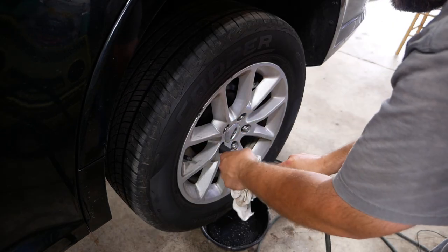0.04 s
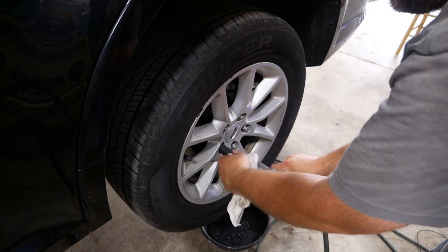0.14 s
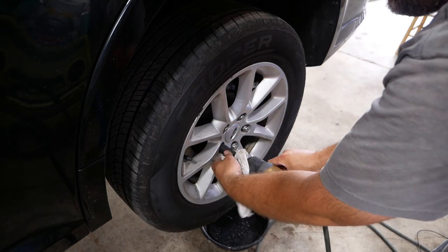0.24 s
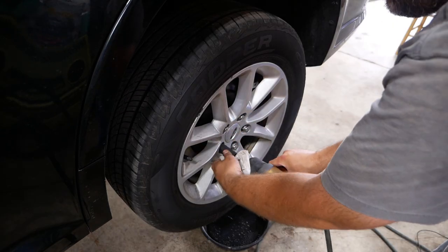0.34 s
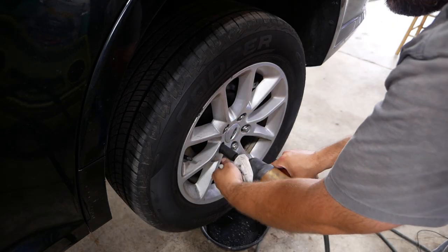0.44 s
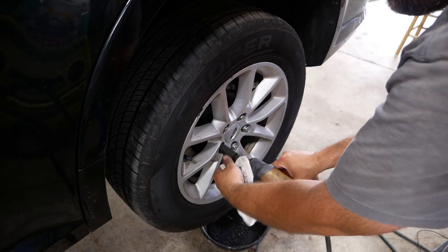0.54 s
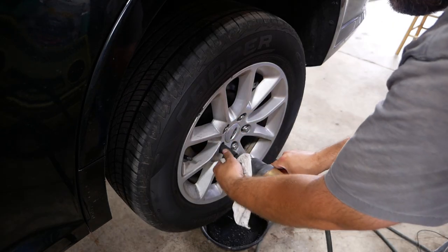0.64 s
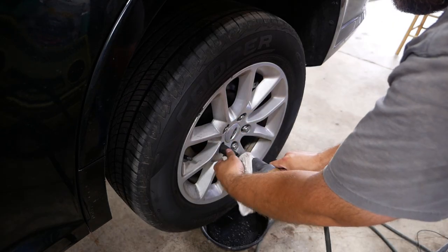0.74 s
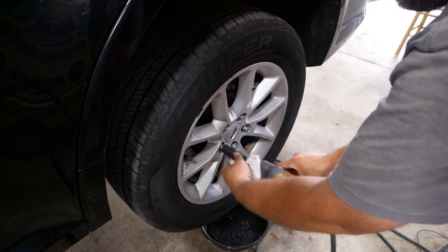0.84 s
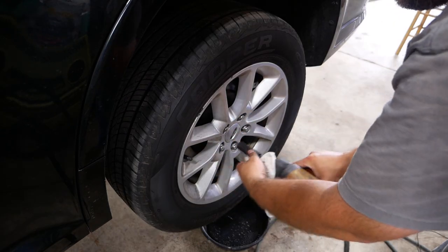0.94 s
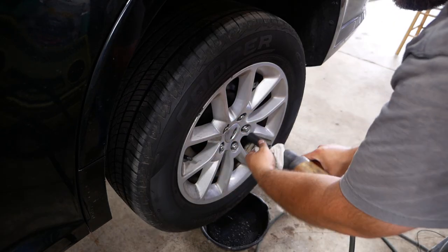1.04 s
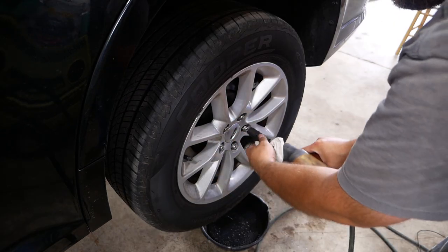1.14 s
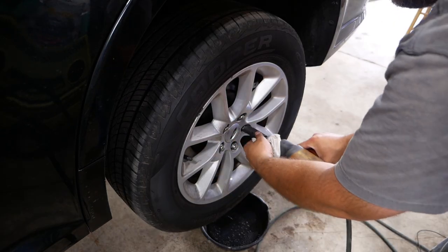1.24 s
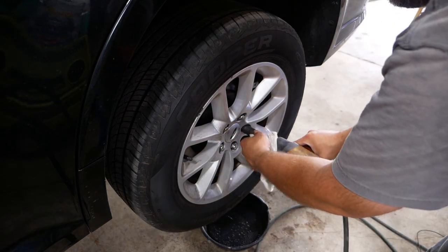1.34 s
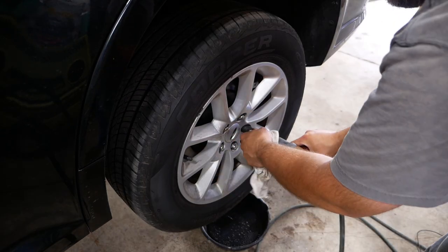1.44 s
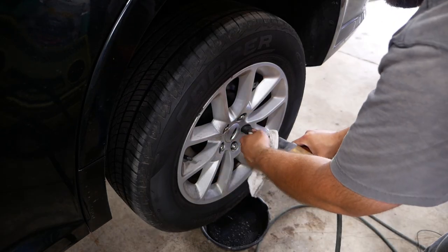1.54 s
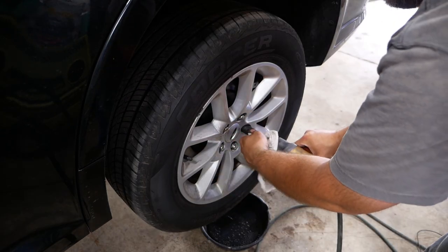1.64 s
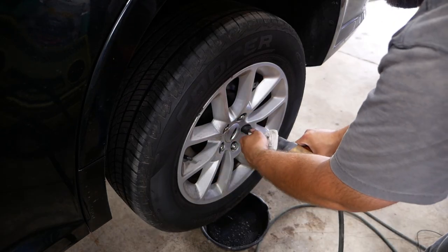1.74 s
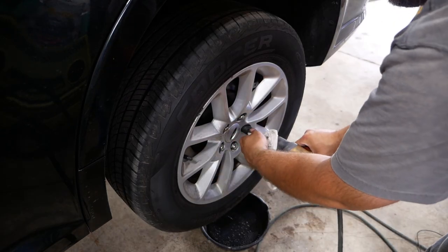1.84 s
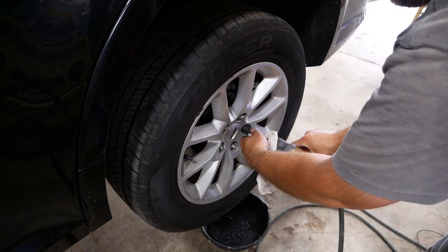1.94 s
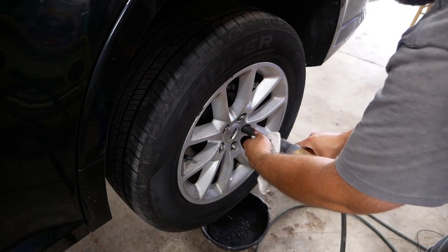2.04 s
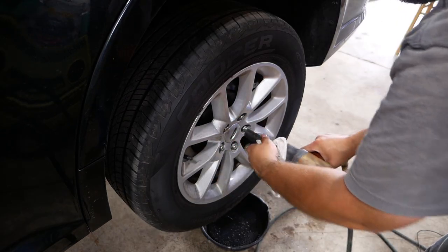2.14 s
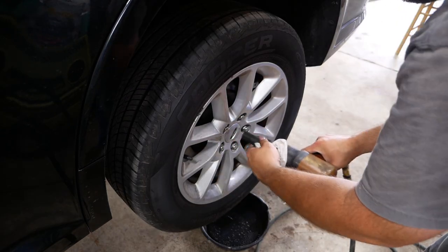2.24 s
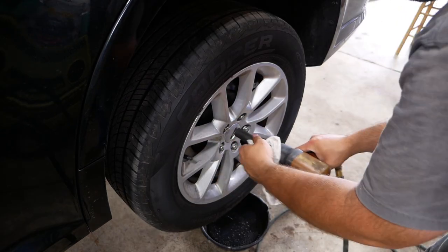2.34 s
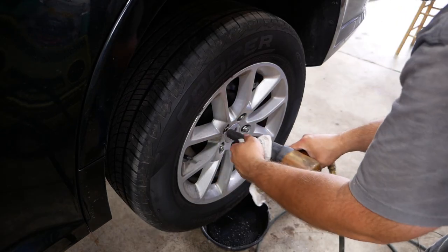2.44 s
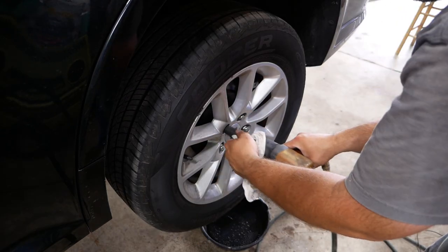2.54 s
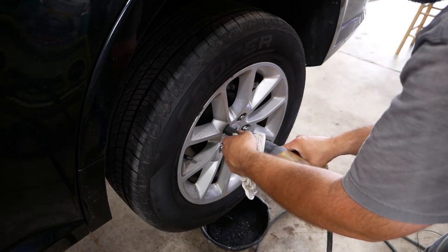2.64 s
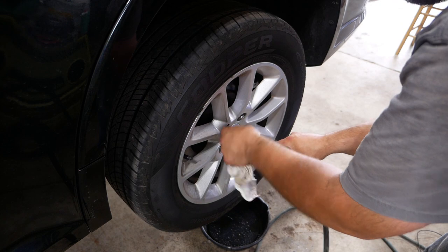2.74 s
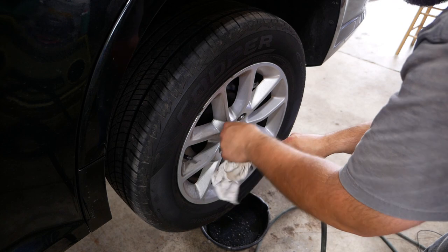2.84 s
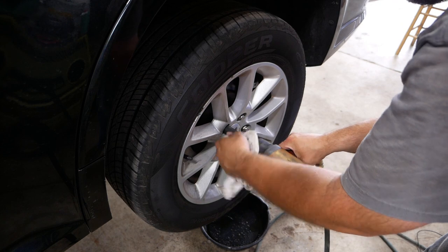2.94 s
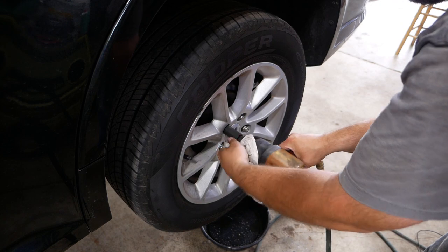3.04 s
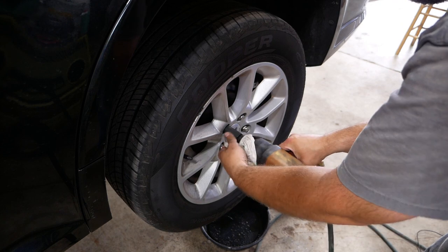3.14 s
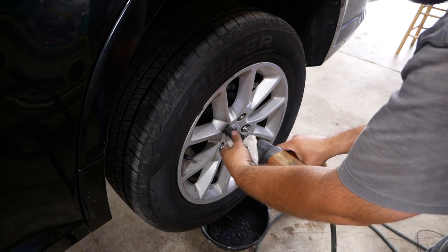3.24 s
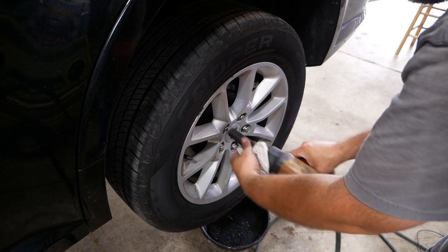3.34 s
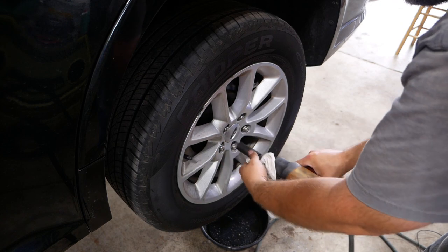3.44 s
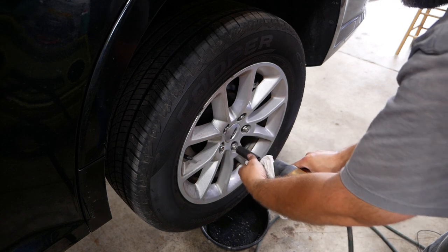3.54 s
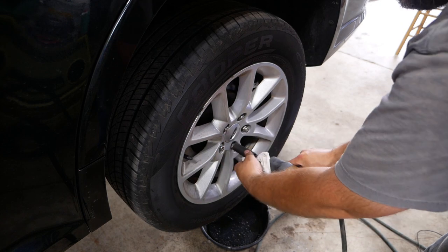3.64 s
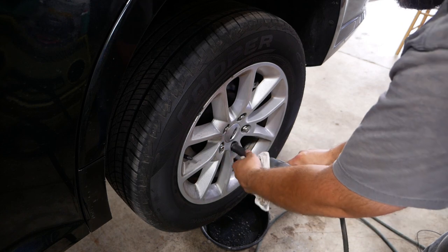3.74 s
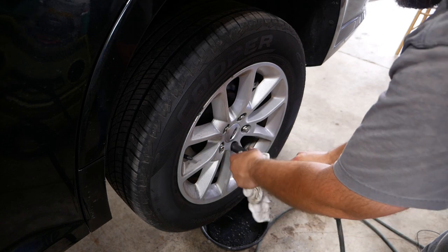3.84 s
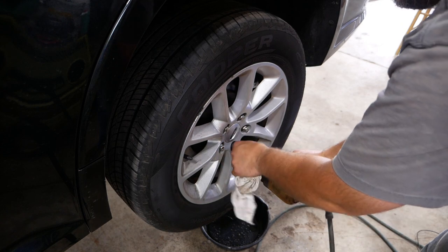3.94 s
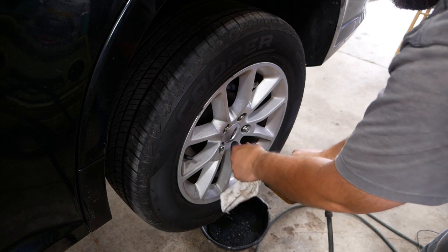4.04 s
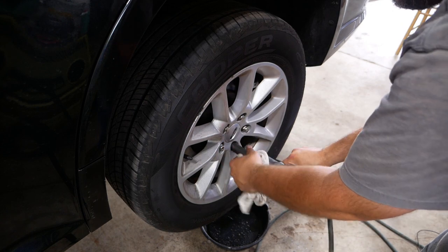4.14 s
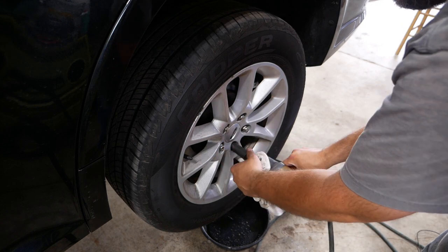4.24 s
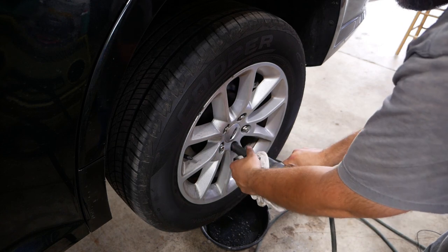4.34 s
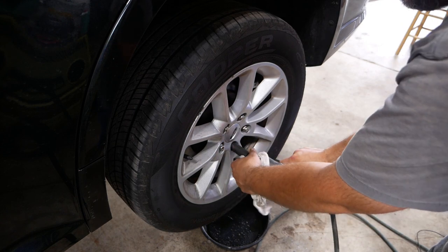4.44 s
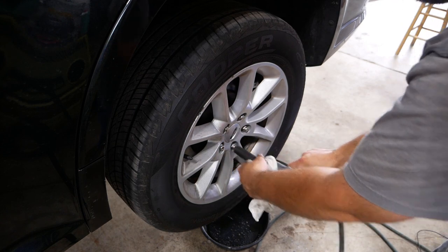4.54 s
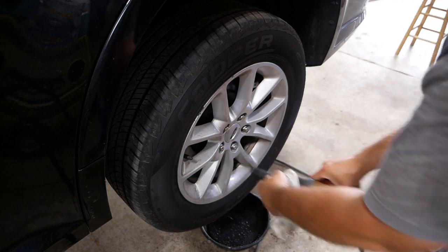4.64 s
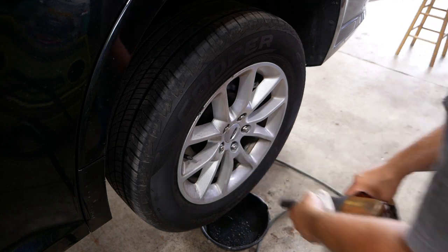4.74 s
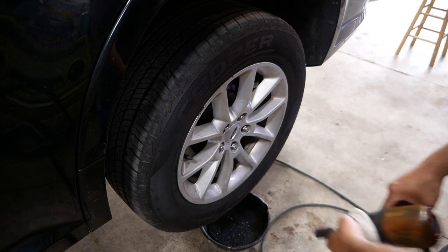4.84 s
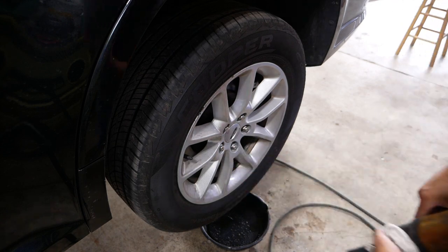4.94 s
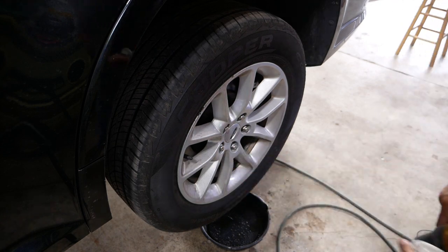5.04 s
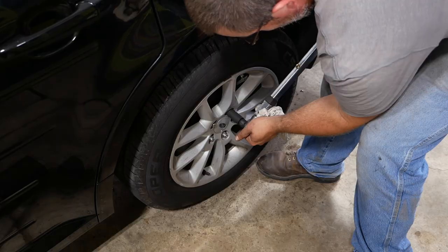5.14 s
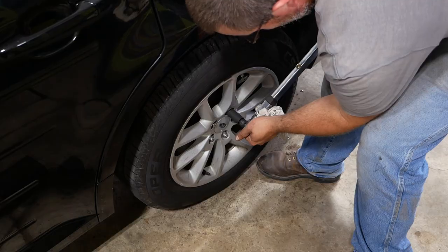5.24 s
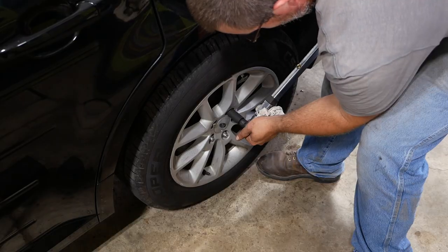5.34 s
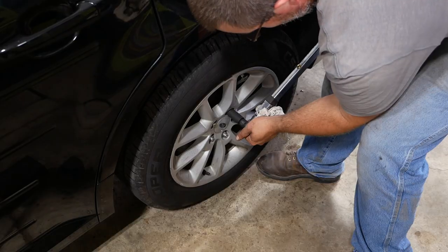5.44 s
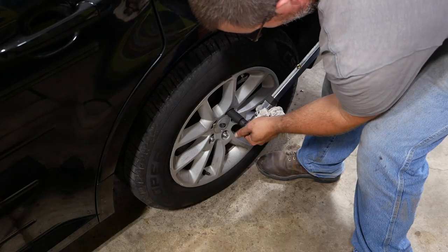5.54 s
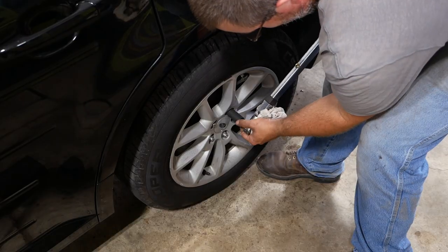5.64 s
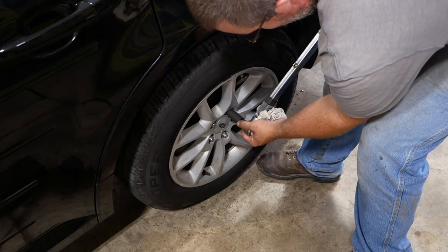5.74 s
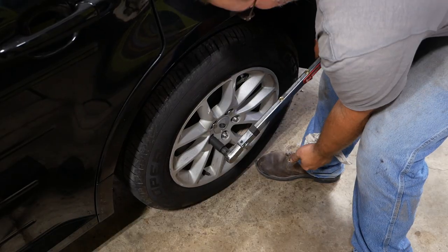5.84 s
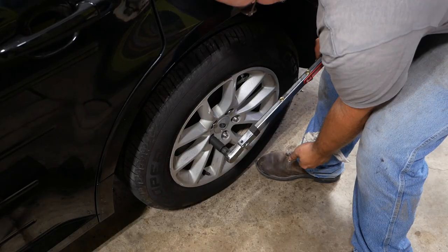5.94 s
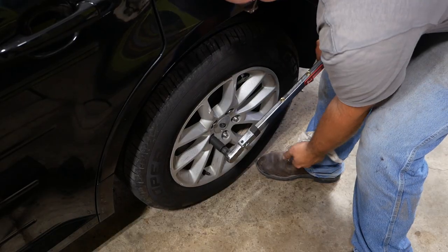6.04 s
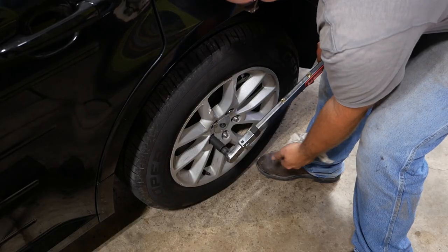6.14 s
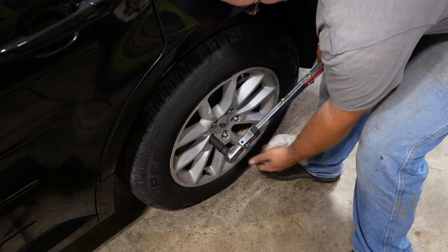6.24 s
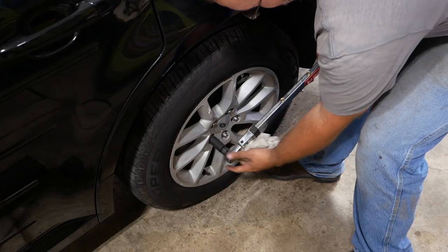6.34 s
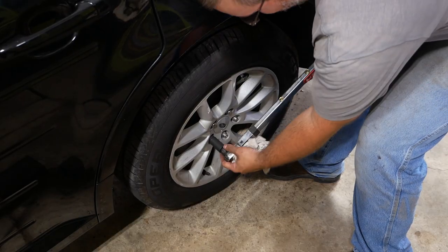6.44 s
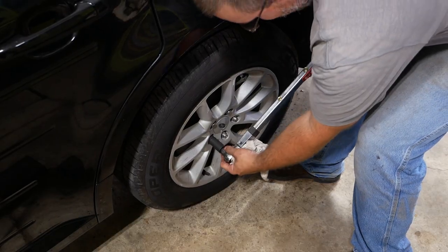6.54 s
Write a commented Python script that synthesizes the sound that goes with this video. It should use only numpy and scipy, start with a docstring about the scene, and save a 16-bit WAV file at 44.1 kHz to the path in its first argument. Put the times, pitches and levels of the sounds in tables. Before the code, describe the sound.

A loose steel socket clinks lightly on a lug nut in a big, echoing garage. At about 0.5 seconds an air impact wrench fires a burst of roughly a quarter second: a chugging motor, hissing air and five or six rapid, clanging hammer blows. Similar bursts follow at about 1.7, 3.0 and 4.2 seconds. Between them the socket clinks and knocks on the nuts, with soft, low tyre thuds, while the hall rings on. A few firmer knocks come around 4.5 seconds, and the fading echo cuts off just after 5.1 seconds. A hand torque wrench then clicks over with a sharp, ringing metallic snap at 5.3 seconds and snaps back more softly at 5.7. The echo cuts off again, and a second loud and soft pair follows at 6.1 and 6.5 seconds. The tools sit straight ahead, over very faint room noise.

```python
"""A loose socket clinks in a big, echoing garage, then an air impact wrench rattles four lug nuts tight.
Its air motor chugs up to speed, drives a steel hammer blow, stalls and starts again, with hissing air.
Between bursts the socket knocks on the nuts, the tyre thuds and the hall rings on.
Last, a hand torque wrench clicks over and snaps back, twice. Before each pair of clicks
the echo cuts off abruptly."""
import sys
import numpy as np
from scipy import signal
from scipy.io import wavfile
from scipy.ndimage import uniform_filter1d

SR = 44100
rng = np.random.default_rng(int(sys.argv[2]) if len(sys.argv) > 2 else 0)


def waveform_to_disk(signal):
    """Save audio, clipped to [-1, 1], as 16-bit WAV at the path in sys.argv[1]."""
    frames = np.transpose(np.atleast_2d(signal))
    scaled = np.clip(frames, -1, 1) * 32767
    samples = np.round(scaled).astype(np.int16)
    wavfile.write(sys.argv[1], SR, samples)


N = 290178

# trigger pulls, one per nut: start t/s, kick level/dB, first blow t/s, first gap/s,
# gap growth per blow/s, blow level/dB
PULLS = [(0.468, -1, 0.5029, .0534, .0016, -.5), (1.687, -0.3, 1.7243, .055, .0018, 0),
         (2.998, -1.5, 3.0306, .0514, .0025, 0), (4.172, -1, 4.2141, .0527, .0018, .5)]
# number of hammer blows in each pull
BLOW_COUNTS = [5, 6, 5, 5]
# resonances of socket and wheel: f/Hz, width/Hz, level/dB
SOCKET_MODES = [(916, 340, -5), (1834, 410, -0.5), (2803, 670, -6.5), (4630, 210, -11.5), (6090, 220, 3),
                (9330, 1400, 11), (10960, 300, -0.5), (13800, 700, -28.5)]
# thin ring of the anvil, the part the hammer hits: f/Hz, level/dB, t60/s (time to fade by 60 dB)
ANVIL_MODES = [(4340, -13, .12), (6010, -3.5, .3), (9685, -1, .3), (10944, -3, .4), (11056, 0, .45),
               (13760, -7, .45)]
# the two moments when the ringing cuts off: t/s
CUTOFFS = [5.143, 5.845]


def amp(db):
    """Turns decibels into a gain."""
    return 10 ** (np.asarray(db) / 20)


def read(points, hz):
    """Reads a curve on a log-frequency axis."""
    f, value = np.transpose(points)
    return np.interp(np.log(hz + 1), np.log(f + 1), value)


def add(mix, s, sound):
    """Mixes a sound in at s seconds."""
    part = mix[max(round(s * SR), 0):][:len(sound)]
    part += sound[:len(part)]


def tinted(x, points, size=4096):
    """Filters a sound with the given spectrum, without ringing ahead of it."""
    log_gain = np.log(amp(read(points, abs(np.fft.fftfreq(size, 1 / SR)))))
    taps = np.fft.ifft(np.exp(np.conj(signal.hilbert(log_gain)))).real
    return signal.oaconvolve(x, taps[:size // 2])[:len(x)]


def noise(spectrum):
    """Noise with the given spectrum, at an rms level of 1."""
    x = tinted(rng.standard_normal(N), spectrum)
    return x / np.sqrt(np.mean(x ** 2) + 1e-20)


def ringing(x, modes, direct_db):
    """A force sets resonances ringing; some of it is also heard directly."""
    out = amp(direct_db) * x
    for hz, width, db in modes:
        decay = np.exp(-np.pi * width / SR)
        pole = decay * np.exp(2j * np.pi * hz / SR)
        out = out + 2 * amp(db) * signal.lfilter([1 - decay], [1, -pole], x).real
    return out


def chime(modes):
    """Pure tones that fade freely after a hit."""
    t = np.arange(SR) / SR
    tones = sum(amp(db - 60 * t / t60) * np.sin(2 * np.pi * (hz * t + rng.random()))
                for hz, db, t60 in modes)
    return tones * np.minimum(t / .0013, 1)


def strike(modes, levels_db, contacts_s, scatter_db, scatter_s, direct_db, size=6000):
    """Steel hits steel: a brief rough contact scatters off wheel and floor and rings in three bands."""
    # edges of the body, ring and sizzle bands: f/Hz
    edges = [200, 3500, 7500, 16500]
    t, out = np.arange(size) / SR, np.zeros(size)
    for low, high, db, contact in zip(edges, edges[1:], levels_db, contacts_s):
        fade = np.exp(-t / contact) + amp(scatter_db) * np.exp(-t / scatter_s)
        force = rng.choice([-1., 1.], size) * fade
        bandpass = signal.butter(3, [low, high], "band", fs=SR, output="sos")
        band = signal.sosfilt(bandpass, ringing(force, modes, direct_db))
        loudest = np.sqrt(uniform_filter1d(band ** 2, size=220).max())
        out += amp(db) * band / loudest
    return out


def room_tone(fading_db=-46.5, fade_db_per_s=30, quiet_db=-60.3):
    """The dying ring of an earlier burst, over the quiet of the garage."""
    # spectra of the dying ring and of the steady background: f/Hz, level/dB
    fading_spectrum = [(35, -40), (60, -4), (91, -22), (229, -5.5), (381, -13.5), (418, -20), (619, -11.5),
                       (780, -13.5), (2060, -12), (4730, -28), (6090, -17), (6840, -25), (15000, -47)]
    quiet_spectrum = [(25, -10), (60, -13), (130, -13.5), (200, -17), (500, -21.5), (1500, -29),
                      (4000, -34), (8000, -40.5), (15000, -43)]
    fade = amp(fading_db - fade_db_per_s * np.arange(N) / SR)
    return fade * noise(fading_spectrum) + amp(quiet_db) * noise(quiet_spectrum)


def socket_knocks(thud_db=5.5, anvil_db=-25, ping_db=-11, thock_hz=680, clang_hz=2050):
    """The loose socket knocks on a nut; a harder push makes the wheel thock and the tyre thud."""
    # knocks: t/s, strength/dB, steel ring level/dB, thud level/dB, ping f/Hz
    knocks = [(0.178, -30, -47, -51, 14000), (0.203, -23, -38, -50, 5900), (0.28, -16, -35, -39, 8670),
              (0.835, -7, -16, -37, 4480), (1.274, -27, -42, -52, 5960), (1.32, -22, -38, -49, 6060),
              (1.38, -23, -38, -51, 5290), (1.473, -23, -39, -43, 6160), (2.086, -4, -18, -45, 6010),
              (2.134, -15, -26, -43, 13700), (2.54, -16, -27, -38, 5900), (2.603, -15, -33, -41, 6000),
              (2.718, -7, -18, -48, 5940), (2.795, -16, -30, -42, 4480), (3.699, -18, -32, -47, 9700),
              (3.789, -12, -21, -49, 6090), (3.815, -17, -31, -42, 9830), (3.908, -21, -37, -46, 9140),
              (3.977, -12, -29, -34, 4410), (4.465, -9, -20, -30, 6120), (4.502, -6, -17, -40, 4340),
              (4.557, -3, -16, -40, 4540)]
    # the socket grazes, lands and bounces: delay/s, level/dB
    touches = [(0, -15), (.0022, 0), (.025, -17)]
    # the room's long low hum at 134 Hz and the tyre's short thud near 200 Hz: f/Hz, level/dB, t60/s
    thud_modes = [(134.3, -14, 1.), (188.6, -3, 0.26), (206.8, -4.5, 0.21), (221, -7, .3)]
    out = np.zeros(N)
    for s, strength, ring, thud, ping_hz in knocks:
        push = thud - strength
        levels = np.array([strength + .28 * push - 3, ring - 4.5, ring - 7.5])
        contacts = (.003 + .00017 * abs(strength)) * np.array([1.3, .8, .7])  # soft knocks last longer
        modes = SOCKET_MODES + [(thock_hz, 400, 18 + .75 * push), (clang_hz, 800, 2), (ping_hz, 240, 5)]
        for delay, db in touches:
            touch = strike(modes, levels + db, contacts, scatter_db=-14, scatter_s=.024, direct_db=-18)
            add(out, s + delay, touch)
        ping_t60 = .13 * (ping_hz / 10000) ** 1.5  # the hand damps low pings most
        ping = chime([(ping_hz, ring + ping_db, ping_t60)])
        anvil = amp(levels[-1] + anvil_db) * chime(ANVIL_MODES)
        thud_and_hum = amp(thud + thud_db) * chime(thud_modes)
        add(out, s + touches[1][0], ping + anvil + thud_and_hum)
    return out


def hall(x, tint, swell_db, swell_s):
    """A big room's echo, its level raised for a moment before each pitch fades at its own speed."""
    # how long the hall rings: f/Hz, t60/s
    ring_times = [(60, 2.), (135, 2.3), (300, 1.55), (1000, 1.85), (2000, 1.74), (4000, 1.42), (6000, 1.3),
                  (9000, 1.05), (15000, 0.75)]
    hz, t, bands = signal.stft(rng.standard_normal(2 * SR), SR, nperseg=256)
    fall_db = swell_db * np.minimum(t / swell_s, 1) - 60 * t / read(ring_times, hz)[:, None]
    tail = signal.istft(bands * amp(fall_db) * (t > .008), SR, nperseg=256)[1]
    return signal.fftconvolve(x, tinted(tail / np.linalg.norm(tail), tint))[:len(x)]


def blow_times(first_s, gap_s, growth_s, count):
    """The hammer slows as the nut tightens: each gap is a little longer than the last."""
    k = np.arange(count)
    return first_s + k * gap_s + k * (k - 1) / 2 * growth_s


def run_up(length_s, from_hz, to_hz, coast_s, rough):
    """The motor's vanes speed up until the hammer lands; returns their puffs and the pulsing air flow."""
    t = np.arange(round((length_s + 4 * coast_s) * SR)) / SR
    rate = from_hz + (to_hz - from_hz) * np.minimum(t / length_s, 1)
    cycles = np.cumsum(rate * np.exp(.06 * rng.standard_normal())) / SR
    flow = np.exp(-np.maximum(t - length_s, 0) / coast_s)
    puffs = np.diff(np.floor(cycles), prepend=-1) * flow * np.exp(rough * rng.standard_normal(len(t)))
    return puffs, flow * (.5 + np.exp(-(cycles % 1) / .17))


def air_motor(chug_db=17.5, hiss_db=-29.6, leak_db=-37, kick_db=11, jolt_db=25.5, rush_db=6,
              spit_db=-22.5, run_s=.033, valve_s=.015, windup_s=.008, fade_s=.043):
    """Each pull opens the valve; the motor kicks, then stalls at each blow and restarts for the next."""
    # spectra of the motor's puffs, its starting jolt and the exhaust: f/Hz, level/dB
    chug_spectrum = [(30, -32), (80, -8.5), (130, -1), (185, 1), (225, -5), (290, -2), (390, -5), (510, -5),
                     (750, -15.5), (1500, -21), (3000, -22), (8000, -44)]
    jolt_spectrum = [(25, -11.5), (50, -6), (90, 0.5), (170, -1), (300, -6.5), (600, -25.5), (3000, -44)]
    hiss_spectrum = [(240, -27.5), (400, -2), (496, -2.5), (826, -7), (1270, -2.5), (1460, -2), (1790, -1),
                     (3870, -13.5), (5270, -12.5), (6050, -10), (6950, -21.5), (10900, -11.5),
                     (11900, -25.5), (13700, -16), (16000, -48)]
    # hollow resonances of the tool's housing and the wheel well: f/Hz, width/Hz, level/dB
    housing_modes = [(188, 41, -5), (251, 11, -8.5), (286.7, 50, -8.5), (497, 100, -6)]
    puffs, jolts, flow = np.zeros((3, N))
    t = np.arange(N) / SR
    for (start, db, first_s, gap_s, growth_s, _), count in zip(PULLS, BLOW_COUNTS):
        hits = blow_times(first_s, gap_s, growth_s, count)
        valve_times = [start - 2 * valve_s, start - valve_s, start, hits[0],
                       hits[0] + valve_s, hits[-1] + valve_s, hits[-1] + 2 * valve_s]
        flow += amp(leak_db) * np.interp(t, valve_times, [0, 2.2, 6.5, 2, 1, 1, 0])
        # the first chug is loudest and fades quickly
        first, air = run_up(hits[0] - start + windup_s, 115, 280.6, coast_s=.0035, rough=.25)
        age = np.arange(len(first)) / SR - windup_s
        loudness = np.exp(np.minimum(age / windup_s, -age / fade_s))
        add(puffs, start - windup_s, amp(db + kick_db) * first * loudness)
        add(jolts, start + .0023, amp([db + jolt_db]))
        add(flow, start, amp(hiss_db + rush_db) * air[round(windup_s * SR):])
        for s in hits[1:]:
            restart, air = run_up(run_s, from_hz=140, to_hz=303.7, coast_s=.003, rough=.29)
            swell = np.interp(np.arange(len(restart)) / SR, [0, run_s / 2], [.7, 1.1])
            add(puffs, s - run_s, restart * swell)
            add(flow, s - run_s, amp(hiss_db) * air)
    # every puff leaves the exhaust with a short spit of swirling air
    flow += amp(spit_db) * signal.lfilter([1], [1, -np.exp(-1 / (.00083 * SR))], puffs)
    chug = amp(chug_db) * ringing(tinted(puffs, chug_spectrum), housing_modes, direct_db=-4)
    return flow * noise(hiss_spectrum) - chug - tinted(jolts, jolt_spectrum)


def hammer(blow_db=(-13.2, -18.3, -15.5), uneven_db=.8, seating_db=4, cam_db=-14, cam_lead_s=.019,
           anvil_db=-28):
    """The cam clacks lightly, then the hammer hits the anvil; the socket sits differently every time."""
    # clang of the wheel and its studs: f/Hz, width/Hz, level/dB
    clang_modes = [(966, 80, -6), (1293, 110, -8), (1535, 130, -3), (1763, 90, 1), (1829, 70, 1),
                   (1990, 150, -1), (2450, 300, -4), (3375, 150, -8), (4344, 60, -6), (5420, 150, -6),
                   (9685, 120, 2)]
    out = np.zeros(N)
    for (_, _, first_s, gap_s, growth_s, db), count in zip(PULLS, BLOW_COUNTS):
        for k, s in enumerate(blow_times(first_s, gap_s, growth_s, count)):
            levels = db + np.array(blow_db) + uneven_db * rng.standard_normal(3)  # body, ring, sizzle
            if k == 0:
                levels += (3.5, 4.5, 2.5)  # the longest run-up hits hardest
            if k == count - 1:
                levels += (-1, 4, -1)  # the seated nut rings more
            clang = [(hz, width, ring + seating_db * rng.standard_normal())
                     for hz, width, ring in clang_modes]
            add(out, s, strike(SOCKET_MODES + clang, levels, [.0033, .0012, .001],
                               scatter_db=-19, scatter_s=.017, direct_db=-22.5))
            add(out, s, amp(levels[-1] + anvil_db) * chime(ANVIL_MODES))
            cam_levels = levels + cam_db + 2 * rng.standard_normal(3)
            add(out, s - cam_lead_s, strike(SOCKET_MODES, cam_levels, [.003, .003, .002],
                                            scatter_db=-19, scatter_s=.01, direct_db=-23))
    return out


def torque_wrench(jolt_db=-28, jolt_growth=2.4, rebound_db=-7, rebound_s=.0038, thump_db=34, echo_db=47):
    """A catch slips over, rebounds and rings the shaft; hard clicks jolt the wheel into ringing too."""
    # clicks: t/s, strength/dB
    clicks = [(5.3454, .2), (5.7339, -10.3), (5.9963, -43), (6.0684, -.6), (6.4709, -9)]
    # resonances of the wrench's shaft and of the wheel: f/Hz, width/Hz, level/dB
    shaft_modes = [(1740, 760, -17), (2320, 400, -17.5), (2900, 400, -13.5), (3900, 610, -27),
                   (7780, 90, -16.5), (4840, 120, -16), (5160, 113, 7), (5390, 76, -0.5), (6030, 110, -22),
                   (6400, 100, -21), (8200, 220, -18.5), (8870, 220, -15), (9610, 250, -14.5),
                   (10440, 320, -18), (14300, 450, -11.5)]
    wheel_modes = [(815, 60, -8), (1510, 180, -19.5), (2354, 100, -9.5), (2680, 290, -11.5),
                   (3500, 970, -17.5), (5060, 150, -13), (5230, 77, 0), (5415, 52, 2), (5500, 86, -1.5),
                   (6110, 90, -1.5), (6910, 45, -5), (8100, 440, -15.5), (9150, 310, -17.5),
                   (10400, 870, -28)]
    # tone of the clicks' echo: f/Hz, level/dB
    echo_tint = [(100, -11), (500, -5.5), (900, -4), (11000, 1), (12000, -8), (13500, -4), (14500, 2),
                 (15500, -9)]
    thump_spectrum = [(60, -15.5), (200, -2.5), (700, 2.5), (1000, 8.5), (1350, 9), (1800, -12.5),
                      (4000, -19), (12000, -40.5)]  # f/Hz, level/dB
    out, jolt = np.zeros(N), signal.unit_impulse(SR)
    thump = amp(thump_db) * tinted(jolt, thump_spectrum)
    wheel = ringing(jolt, wheel_modes, direct_db=-38)
    for s, db in clicks:
        levels = np.array([jolt_growth * db - 18.5, db - 7, db - 11])  # body, ring, sizzle
        echo = amp(echo_db) * hall(wheel, echo_tint, swell_db=16.5, swell_s=.29)
        click = amp(jolt_db + jolt_growth * db) * (thump + echo)
        add(click, 0, strike(shaft_modes, levels, [.0009, .0008, .0015],
                             scatter_db=-22, scatter_s=.016, direct_db=-32.5))
        add(click, rebound_s, strike(shaft_modes, levels + rebound_db, [.001, .0006, .0015],
                                     scatter_db=-28, scatter_s=.0088, direct_db=-35))
        if s < CUTOFFS[1]:
            click = click[:round((CUTOFFS[1] - s) * SR)]
        add(out, s, click)
    return out


def smeared_copy(x):
    """A smeared copy that widens the sound, most in bass and treble."""
    smear = rng.standard_normal(500) * np.linspace(1, 0, 500) ** 2
    smeared = signal.oaconvolve(x, smear / np.linalg.norm(smear))[:N]
    return tinted(smeared, [(40, 13), (200, 2), (1200, 3), (4000, 7), (12000, 12)])


def scene(wrench_echo_db=-11.7, knock_echo_db=-14, smear_db=-33, wash_db=-30, rumble_db=-73.5):
    """The tools are straight ahead; a faint smear, wash and low rumble differ between left and right."""
    # tone of the hall's echo and of a low rumble: f/Hz, level/dB
    hall_tint = [(40, -3), (90, -6), (135, 2), (180, -9), (350, -1), (800, 0.5), (2000, -3), (4000, 1),
                 (5300, -2.5), (6100, 1), (7000, 1), (9500, -6), (10600, -6), (11100, 0), (12000, -7),
                 (15000, -10)]
    rumble_spectrum = [(25, 0), (60, -5), (130, -14), (400, -30), (2000, -50)]
    impact_wrench = air_motor() + hammer()
    knocks = socket_knocks()
    into_hall = amp(wrench_echo_db) * impact_wrench + amp(knock_echo_db) * knocks
    echo, wash = (hall(into_hall, hall_tint, swell_db=6.5, swell_s=.26) for _ in range(2))
    gate = np.clip((CUTOFFS[0] * SR - np.arange(N)) / 100, 0, 1)  # shuts within 100 samples
    mid = (impact_wrench + knocks + echo) * gate + torque_wrench() + room_tone()
    side = amp(smear_db) * smeared_copy(mid)
    side += amp(wash_db) * (wash * gate + room_tone())
    side += amp(rumble_db) * noise(rumble_spectrum)
    return np.array([mid + side, mid - side])


def record(dry, ceiling=.68, top_hz=15900):
    """Rounds off the sharpest peaks, then removes the highest treble."""
    rounded = dry / (1 + (dry / ceiling) ** 4) ** (1 / 4)
    lowpass = signal.firwin(161, top_hz, window=("kaiser", 9), fs=SR)
    return signal.oaconvolve(rounded, lowpass[None], "same")


dry = scene()
out = record(dry)
waveform_to_disk(out)
```